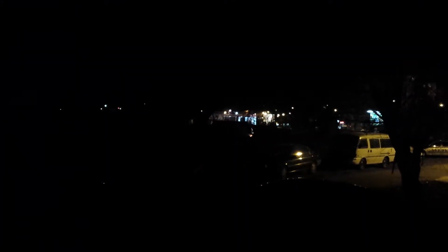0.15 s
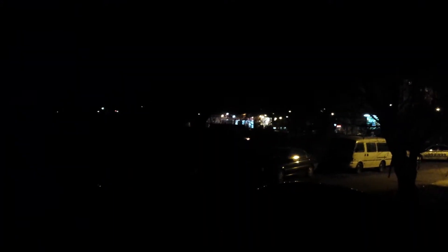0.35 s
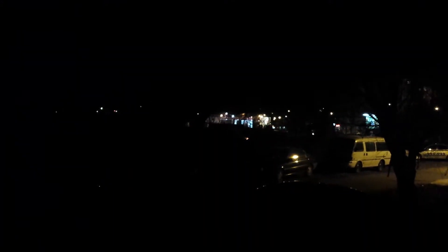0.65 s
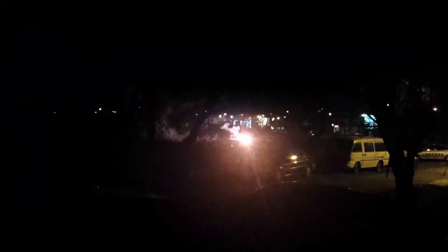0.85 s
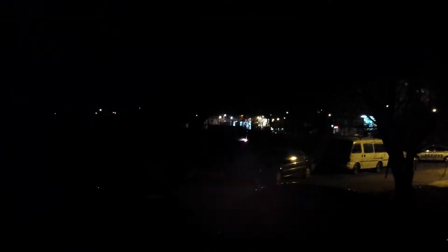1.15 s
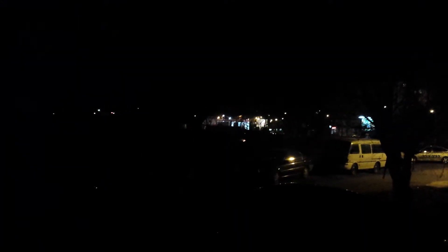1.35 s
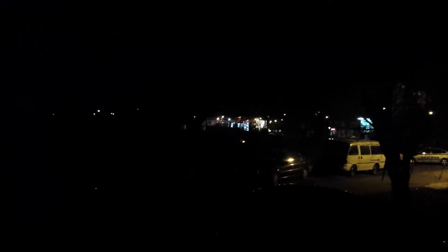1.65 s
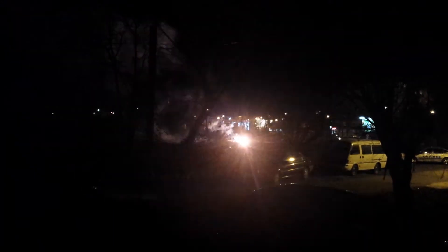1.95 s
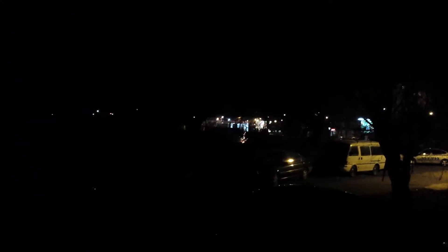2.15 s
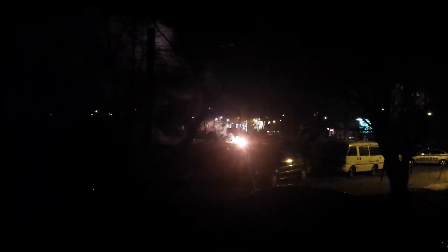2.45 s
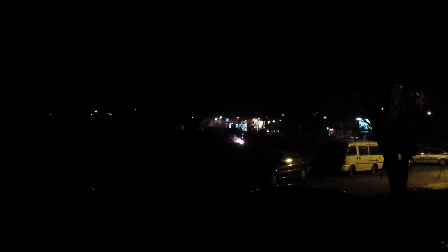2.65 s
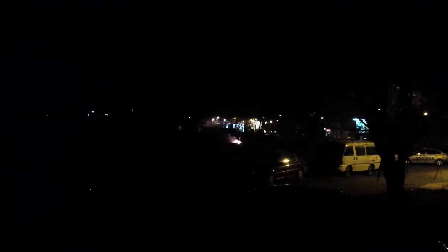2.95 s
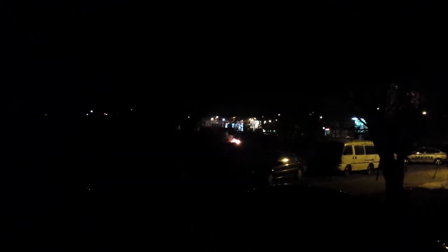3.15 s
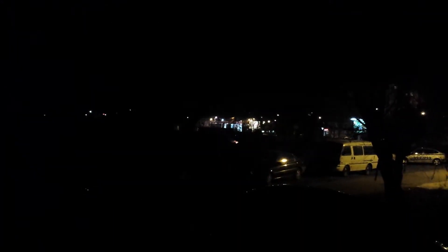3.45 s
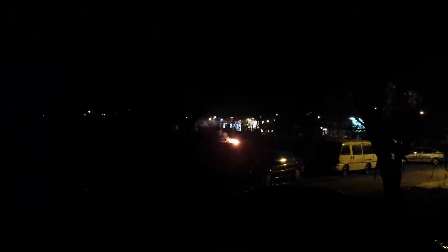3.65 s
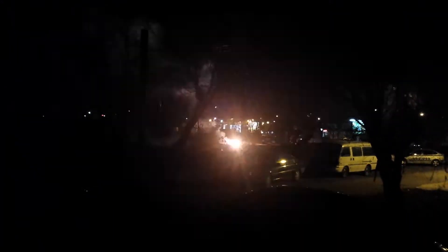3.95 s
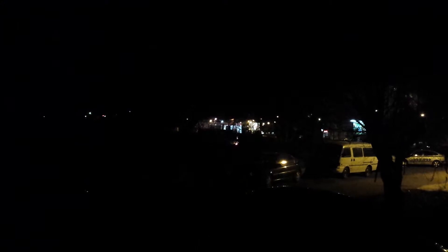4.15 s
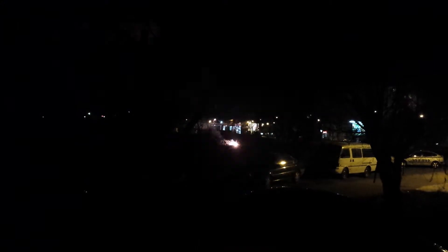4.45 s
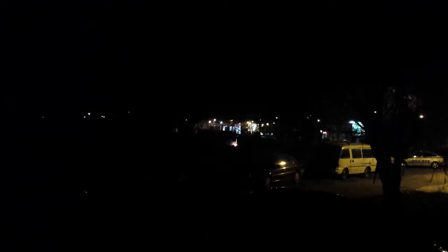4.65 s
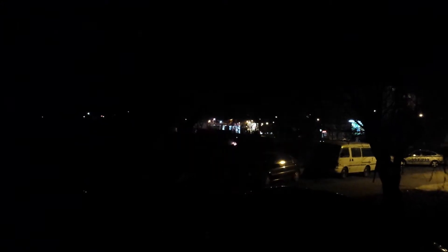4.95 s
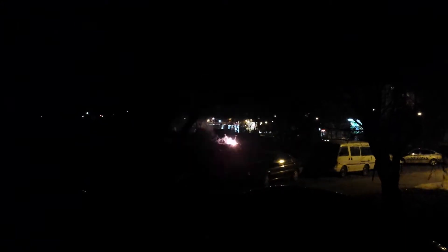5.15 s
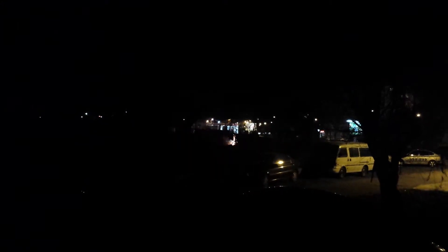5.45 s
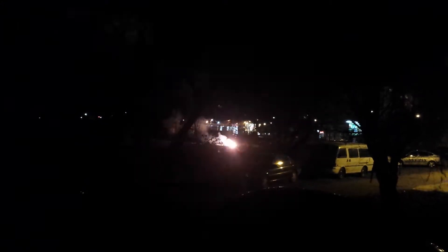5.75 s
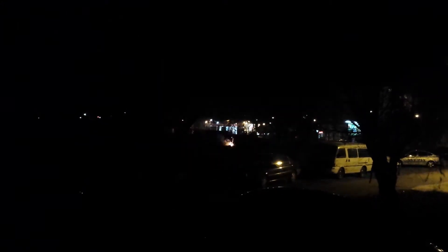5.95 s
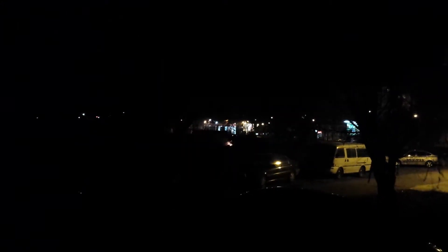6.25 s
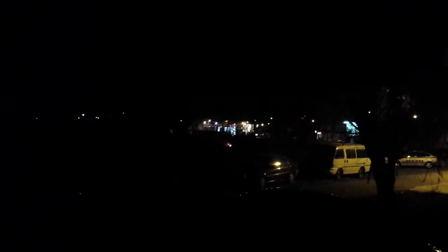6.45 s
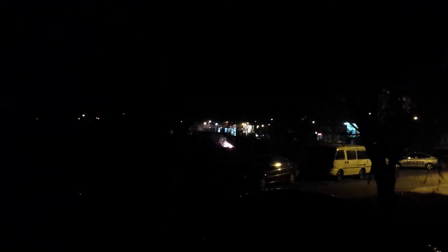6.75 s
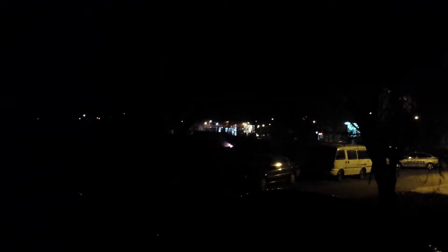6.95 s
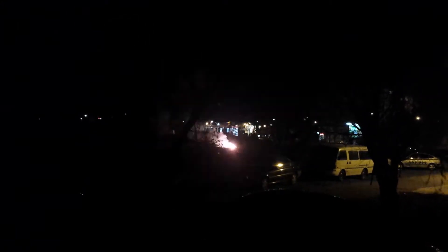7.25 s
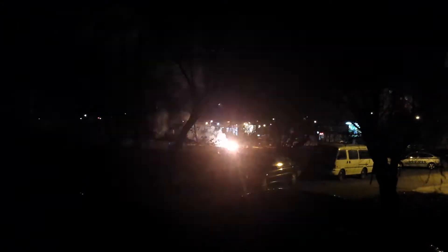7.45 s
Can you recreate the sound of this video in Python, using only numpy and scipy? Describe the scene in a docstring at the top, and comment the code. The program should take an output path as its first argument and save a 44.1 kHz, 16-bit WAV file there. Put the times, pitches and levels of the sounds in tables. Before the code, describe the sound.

A faulty power cable arcs some tens of metres away in a yard between buildings, over a faint, steady wash of far traffic. From about 0.2 to 1.5 seconds come six or so short spurts of bright, buzzing crackle, each with sharp snaps and a dull thump of hot air. After a pause, a stronger burst hits at 2.1 seconds. From 2.6 seconds the arcing is nearly continuous: an uneven stutter of high, pinging cracks, rasping buzz and sizzling metal, with a low flame roar underneath. The thumps grow heavier from about 5.3 seconds and are fiercest around 6, where a brief deep swell of air rises beneath them. The crackle stops at 6.5 seconds, then returns in a last flurry from 7 to 7.6. Each crack rings around the yard for up to a second, and a far wall softly echoes the bass.

```python
"""A yard between buildings at night, where a faulty power cable arcs some tens of metres away.
The arc restrikes on each half cycle of the mains: every strike cracks and pushes out a thump of hot air.
In the fiercer bursts molten metal sizzles and the flame roars between the strikes; one burst has a deep
swell under it. The ground reflects, the buildings reverberate, and far traffic makes a faint wash."""
import sys
import numpy as np
from scipy import signal
from scipy.fft import rfft, irfft
from scipy.io import wavfile
from scipy.ndimage import uniform_filter1d, minimum_filter1d

SR = 44100
rng = np.random.default_rng(int(sys.argv[2]) if len(sys.argv) > 2 else 0)


def unload_audio(sound):
    """Save the sound as a 16-bit wav file, at the path given as the first command line argument."""
    columns = np.transpose(np.atleast_2d(sound))
    # keep every value between -1 and 1, then stretch to whole-number steps
    steps = np.round(np.clip(columns, -1, 1) * 32767)
    wavfile.write(sys.argv[1], SR, steps.astype(np.int16))


N = 334674
HZ = np.fft.rfftfreq(N, 1 / SR)
STRIKES_PER_S, FIRST_STRIKE_S = 100, .0064  # two strikes per mains cycle
PING_HZ, PING_HZ_PER_DB = 5585, 153  # a shorter spark channel pings higher and is brighter

# Strikes that stand out, alone or where a burst ignites, flares or breaks:
# (time [s], relative crack level [dB], relative thump level [dB], ping frequency [Hz], duration [s])
SNAPS = [(0.2473, -19.5, -24.5, 4870, 0.0045), (0.258, -18, -31, 5230, 0.0052),
         (0.2927, -24, -37, 5700, 0.0026), (0.301, -20, -30, 5530, 0.0041),
         (0.5944, -24, -20.5, 5050, 0.0031), (0.6103, -19, -42, 5800, 0.0018),
         (0.8634, -16.5, -32, 8870, 0.0055), (1.168, -19, -20.5, 5530, 0.0041),
         (1.185, -19.5, -40, 6000, .0034), (1.201, -18, -32, 5740, 0.0055),
         (1.313, -18, -25.5, 3450, 0.0071), (1.3845, -21.5, -31, 5500, 0.0041),
         (1.473, -15.5, -19, 3370, 0.0083), (2.1431, -13, -27, 5617, 0.0072),
         (2.651, -26, -28.5, 6060, .0035), (2.6597, -21, -30, 5960, .0035), (2.669, -25, -32, 6100, 0.0048),
         (2.678, -20.5, -30, 5880, .004), (2.689, -20, -35, 5960, .0047), (2.699, -24, -34, 6000, 0.0057),
         (2.711, -16.5, -37, 6000, 0.0063), (2.753, -22, -24.5, 5900, 0.0059),
         (2.8265, -20, -22.5, 5310, 0.0036), (2.8665, -23.5, -24.5, 4450, 0.0026),
         (2.8853, -27.5, -31, 5830, 0.0036), (2.8945, -18.5, -23, 5760, 0.0066),
         (2.907, -21.5, -22.5, 5460, .0048), (3.0174, -23.5, -31, 5837, 0.0028),
         (3.1047, -13.5, -23, 5630, 0.0041), (3.124, -19.5, -26, 7000, 0.0057),
         (3.187, -23, -26.5, 5984, 0.004), (3.207, -23.5, -27, 5960, .003),
         (3.2375, -20, -28.5, 5400, 0.002), (3.276, -27.5, -26.5, 5900, 0.0034),
         (3.338, -21.5, -22.5, 5700, .0023), (3.3475, -21.5, -23.5, 4700, 0.0026),
         (3.3954, -20.5, -22, 5870, 0.0039), (3.4354, -21.5, -23, 5960, 0.0051),
         (3.4865, -24, -22, 5700, 0.0033), (3.687, -25.5, -24.5, 5916, 0.0029),
         (3.697, -22, -24, 5670, 0.0021), (3.718, -21, -21, 5880, 0.0019),
         (3.9554, -25.5, -18, 5902, 0.0029), (4.0063, -26, -24, 5580, 0.0023),
         (4.0705, -34, -29, 4895, 0.0043), (4.1182, -23, -40, 5756, 0.0024),
         (4.1286, -24, -33, 5710, 0.002), (4.1378, -14.5, -30, 5600, 0.0032),
         (4.147, -20.5, -28, 5690, .003), (4.1666, -16.5, -26, 5695, 0.0039),
         (4.196, -15, -25, 5900, 0.0019), (4.235, -18, -30, 5800, .0032),
         (4.2456, -13.5, -24, 6100, 0.0017), (4.265, -19.5, -26, 6200, 0.0028),
         (4.304, -22, -23.5, 6400, 0.0018), (4.568, -22, -25, 5600, 0.0032),
         (4.575, -18.5, -25.5, 5880, 0.0051), (4.585, -19, -32, 5860, 0.0031),
         (4.7273, -31, -27, 5950, .003), (4.8258, -24, -22, 5834, 0.0044),
         (4.827, -19.5, -25, 2046, 0.0069), (4.893, -21, -25, 5570, .003),
         (5.0227, -25.5, -22, 5730, 0.0054), (5.0862, -29.5, -18.5, 5900, .0071),
         (5.1058, -35, -24, 5870, .003), (5.1977, -35, -28, 5690, 0.0037),
         (5.223, -21.5, -27.5, 5900, 0.0036), (5.281, -27, -26.5, 6090, 0.002),
         (5.3183, -27, -17.5, 5480, 0.0045), (5.4084, -21, -27.5, 5580, 0.0033),
         (5.445, -21.5, -22, 5380, 0.0076), (5.467, -20, -26, 5190, 0.0045),
         (5.5566, -26.5, -24, 5350, 0.004), (5.5654, -20.5, -16.5, 5420, 0.0039),
         (5.587, -20.5, -17.5, 5900, 0.0015), (5.601, -22, -19, 5700, 0.0026),
         (5.616, -28, -17, 5404, 0.0059), (5.657, -20.5, -15, 5684, .0035),
         (5.6972, -37, -15.5, 5960, .004), (5.7019, -22.5, -21, 6033, 0.0023),
         (5.804, -23.5, -25, 4280, 0.0058), (5.843, -33, -22, 6240, 0.0032),
         (5.867, -38, -21, 5940, 0.0041), (5.886, -35, -22, 4400, 0.0043),
         (5.9255, -34.5, -20, 5944, 0.0039), (6.0117, -15, -20, 5406, .0056),
         (6.039, -21.5, -11.5, 7704, 0.0038), (6.1104, -21.5, -16, 5870, 0.0033),
         (6.1766, -24, -23, 6030, 0.0045), (6.2368, -23, -23, 5008, .006), (6.277, -24, -42, 4892, .0031),
         (6.296, -15, -35, 4384, 0.0026), (6.332, -18, -26, 4663, 0.0029),
         (6.465, -17.5, -23, 4594, 0.0058), (6.477, -22, -21, 4604, 0.0037), (6.967, -27, -24, 5980, .0018),
         (7.058, -28, -28, 5300, 0.0033), (7.075, -23, -22, 6030, 0.0039),
         (7.0986, -21.5, -21, 6170, 0.0027), (7.1173, -20.5, -29, 6700, 0.0031),
         (7.188, -28, -41, 5956, 0.0017), (7.207, -17.5, -22.5, 5030, 0.0039),
         (7.337, -17, -19, 4980, 0.0015), (7.4164, -27, -22.5, 6600, .0019),
         (7.4345, -26.5, -21, 6200, 0.0026), (7.508, -18.5, -36, 6095, 0.0033),
         (7.5164, -19, -34, 6030, 0.0044), (7.5263, -18, -31, 5415, .0035),
         (7.5854, -21.5, -33, 4920, .003)]
# Spans in which the arc burns: (start [s], end [s], relative crackle level [dB],
# relative thump level [dB], share of unbroken sizzle [0-1], brightness [dB])
BURSTS = [(.242, 0.316, -21, -22.5, 0.86, 9), (.591, 0.619, -17, -20.5, 1, -5.5),
          (.858, 0.876, -22, -25.5, 0.9, 7), (1.164, 1.211, -17.5, -22, 0.94, -1),
          (1.313, 1.327, -8, -17, 1, -14), (1.365, 1.396, -20.5, -25.5, 0.93, 4),
          (1.47, 1.488, -14, -27.5, 1, -4), (2.143, 2.238, -16, -19.5, 0.86, 2.5),
          (2.252, 2.299, -18.5, -19.5, 0.75, 3.5), (2.648, 2.719, -16.5, -22.5, 0.67, 10),
          (2.73, 2.788, -20.5, -25, 0.83, -5), (2.966, 3.007, -24, -26, 0.1, -5.5),
          (3.02, 3.057, -17.5, -29.5, 0, -4), (3.063, 3.089, -24.5, -24, .01, -5),
          (3.102, 3.139, -24, -21.5, 0.24, 11.5), (3.21, 3.24, -23, -26.5, 0, -2.5),
          (3.262, 3.272, -28, -23, 0.04, -2), (3.313, 3.324, -25, -25, .05, -5),
          (3.384, 3.458, -25.5, -26, 0, -3), (3.485, 3.552, -21.5, -25, 0.1, -2),
          (3.555, 3.598, -28.5, -23, 0, -5.5), (3.815, 3.85, -14.5, -22, .25, -4.5),
          (3.916, 4.036, -33, -23, 0.1, 3.5), (4.172, 4.192, -27, -28, 0, -6),
          (4.234, 4.261, -25, -25, 0.75, -1), (4.261, 4.304, -26, -23, 0.79, 19),
          (4.575, 4.687, -27.5, -26, 0.2, 2.5), (4.73, 4.75, -30, -25, 0.05, 3),
          (4.867, 4.909, -17.5, -21, 0.75, -5), (5.011, 5.024, -23.5, -20.5, 0.98, -1),
          (5.206, 5.23, -20.5, -19.5, 0.85, 4), (5.28, 5.334, -20.5, -17, 0.92, 3),
          (5.58, 5.706, -17.5, -17.5, 0.81, 0.5), (6.01, 6.088, -21.5, -15.5, .65, 4),
          (6.105, 6.219, -25.5, -20, 0.43, 2), (6.318, 6.368, -17, -23.5, 0.73, -1),
          (6.374, 6.436, -28.5, -24, 0.21, -6), (7.082, 7.131, -23, -28, 0.35, 5),
          (7.163, 7.226, -31.5, -30, 0.1, 9), (7.53, 7.554, -15, -25, 0.31, 4),
          (7.552, 7.583, -24.5, -25.5, 0.35, 0)]
# Reverberation of the yard: (frequency [Hz], reverberation time [s])
YARD_T60 = [(60, 0.28), (250, 1), (1000, 1), (3000, 1.0), (4200, 0.84), (4750, 0.73), (5250, 0.84),
            (6000, 0.76), (6500, 0.73), (7200, 0.6), (8300, 0.46), (9700, 0.61), (12000, 0.23)]


def strike(crack_db, thump_db, bright_db, ping_hz, ping_db, spark_s, puff_s=.0047, flutter=.68):
    """One ignition: discharges excite the channel's resonances, and thermal expansion pushes the air."""
    t = np.arange(SR // STRIKES_PER_S) / SR
    progress = np.minimum(t / np.clip(spark_s, .0005, t[-1]), 1)
    swell = np.sin(np.pi * progress ** .7)
    spectrum = rfft(rng.standard_normal(len(t)) * swell)
    cluster = irfft(spectrum / np.sqrt(abs(spectrum) + 1e-9), len(t)) * swell  # flatter spectrum
    pitch, strength = rng.standard_normal(2)
    hollow = resonate(cluster, hz=2220 + 200 * pitch, db=1 + 5 * strength, width_hz=220)
    crack = ground_bounce(resonate(hollow, ping_hz, ping_db, width_hz=380))
    push = flutter * unit(np.exp(-t / puff_s) * rng.standard_normal(len(t)))
    push[rng.integers(0, len(t) // 6)] += 1
    scale = np.sqrt(len(t))
    return scale * amp(crack_db) * brighten(crack, bright_db), scale * amp(thump_db) * unit(push)


def snaps():
    """Channel length links pitch to brightness. Yields each snap's time and strike settings."""
    for s, crack_db, thump_db, ping_hz, spark_s in SNAPS:
        bright_db = np.clip((ping_hz - PING_HZ) / PING_HZ_PER_DB, -.5, 12.5)
        ping_db = 5
        yield s, crack_db - 1, thump_db - 2, bright_db, ping_hz, ping_db, spark_s


def buzz(misfire_share=.089, misfire_db=-27, long_share=.12, long_hz=1900, ping_db=1.5, jitter_s=.0004):
    """Periodic reignition: yields time and strike settings for a burst's half cycles without a snap."""
    half_cycles = np.arange(FIRST_STRIKE_S, N / SR, 1 / STRIKES_PER_S)
    chance = rng.standard_normal((len(half_cycles), 7))
    # now and then a half cycle barely ignites, or a long channel gives a low knock
    misfire, long_channel = (rng.random((len(half_cycles), 2)) < [misfire_share, long_share]).T
    free = abs(half_cycles[:, None] - np.array(SNAPS)[:, 0]).min(1) > .5 / STRIKES_PER_S
    for start, end, crackle_db, thump_db, share, burst_bright_db in BURSTS:
        struck_db = 10 * np.log10(1 - np.clip(share, .02, .95))  # energy not spent on sizzle
        for k in np.flatnonzero(free & (half_cycles > start) & (half_cycles < end)):
            s = half_cycles[k]
            force, weight, late, shine, pitch, _, linger = chance[k]
            first = s - start < 1 / STRIKES_PER_S
            force_db = -3 if first else 2.5 * force + misfire_db * misfire[k]
            crack_db = crackle_db + struck_db + heating_db(s, start, end) + force_db
            push_db = thump_db - 2 + struck_db + 3 * weight
            bright_db = burst_bright_db + 4 * shine
            ping_hz = (long_hz if long_channel[k] else PING_HZ + PING_HZ_PER_DB * bright_db) + 280 * pitch
            spark_s = .0035 * (1 + 1.17 * share) * np.exp(.3 * linger)  # longer in a sizzling burst
            yield s + jitter_s * late, crack_db, push_db, bright_db, ping_hz, ping_db, spark_s


def arc():
    """Superposition of all ignitions, as one track of cracks and one of air pushes."""
    cracks, pushes = np.zeros((2, N))
    for s, *settings in [*snaps(), *buzz()]:
        crack, push = strike(*settings)
        add(cracks, s, crack)
        add(pushes, s, push)
    return cracks, pushes


def resonate(x, hz, db, width_hz):
    """Resonance: a spark channel favours a pitch set by its length."""
    f = np.fft.rfftfreq(len(x), 1 / SR)
    return irfft(rfft(x) * (1 + amp(db) / (1 + 2j * (f - hz) / width_hz)), len(x))


def brighten(x, db, corner_hz=7200):
    """A shelving filter lifts or lowers the top octave: thinner sparks are brighter."""
    hz = np.fft.rfftfreq(len(x), 1 / SR)
    shelf = 1 - 1 / (1 + (hz / corner_hz) ** 12)
    return irfft(rfft(x) * amp(db * shelf), len(x))


def heating_db(s, start, end, fade_db=3.5):
    """Heating of the gap: the crackle level falls linearly over a burst."""
    progress = (s - start) / max(end - start, .005)
    return -fade_db * (progress - .5)


def burn(sizzle_db=-5.5, roar_db=-2, throb=.35, hum=.019, peak_s=.00084, flare_db=5.5, flares_per_s=54):
    """Amplitude modulation: molten metal spits and the flame roars in step with the current."""
    sizzle, roar = np.zeros((2, N))
    flares = rng.standard_normal(N)
    for start, end, crackle_db, thump_db, share, bright_db in BURSTS:
        share = np.clip(share, .02, .95)
        t = np.arange(start, max(end, start + .005), 1 / SR)
        cycle = np.cos(2 * np.pi * STRIKES_PER_S * (t - FIRST_STRIKE_S - peak_s))
        current = 1 + throb * cycle
        flare = amp(flare_db * np.interp(t * flares_per_s, np.arange(N), flares))
        spit = unit(sparks(len(t)) * current * flare) * np.sqrt(share * len(t))
        spit_db = crackle_db + sizzle_db + heating_db(t, start, end)
        add(sizzle, start, amp(spit_db) * brighten(spit, bright_db))
        # the flame hums as it swells and shrinks
        flame = np.sqrt(share) * current * rng.standard_normal(len(t)) + hum * cycle
        add(roar, start, amp(thump_db + roar_db) * flame)
    return sizzle, roar


def sparks(samples, per_s=5000, spread_db=2.5):
    """Shot noise: tiny discharges at random moments, a few much larger than the rest."""
    size = amp(spread_db * np.minimum(rng.exponential(1, samples), 4))
    return size * rng.standard_normal(samples) * (rng.random(samples) < per_s / SR)


def crackle(cracks, sizzle, near_db=-8.5, crack_yard_db=-10, sizzle_yard_db=-4, right_yard_db=2):
    """Multipath propagation of the sharp sounds: direct path, early reflections and reverberation."""
    # Spectra of the near sound and of the yard's diffuse field:
    # (frequency [Hz], left level [dB], right level [dB])
    crack_spectrum = [(750, -38, -17.5), (1560, -21.5, -17.5), (1730, -10.5, -14.5), (2250, -12, -18.5),
                      (2900, -13, -24), (3370, -7.5, -9.5), (4280, 4.5, -9.5), (5440, 4.5, -16),
                      (5936, 8.5, -8.5), (6830, -4, -14.5), (8370, -14.5, -11.5), (10740, -36.5, -24),
                      (12100, -57, -30), (13540, -79, -57)]
    yard_spectrum = [(716, -26.5, -5), (1520, -15, -35), (1980, -9, -21), (2840, -7, -16),
                     (3220, -6.5, -14.5), (4310, 2, -15), (4870, 3, -11.5), (5200, 1.5, -10),
                     (5770, 1, -16), (6730, -3, -10), (8000, -10.5, -9.5), (8560, -10, -15),
                     (10970, -54, -21.5), (13500, -61, -45)]
    # Quick reflections from ground and trees: (frequency [Hz], reverberation time [s])
    ground_t60 = [(1200, 0.032), (2500, 0.15), (4500, 0.027), (9000, 0.03)]
    # The wandering arc throws more or less crackle into the yard: (time [s], level [dB])
    throw = [(.25, 1), (.6, 3), (.87, 5.5), (1.2, 0.5), (1.48, 0.5), (2.2, -2), (2.7, 0.5), (3.0, 1),
             (3.7, 0), (4.2, 1), (4.8, 0), (5.3, 3.5), (5.7, 3), (6.4, 0), (6.47, 1), (7.2, 3.5),
             (7.59, -1.5)]
    sizzle = butterworth(sizzle, "high", hz=2200, order=1)  # fine spits lack body
    direct = cracks + sizzle
    near = reflect(direct, ground_t60, likeness=.08, onset_s=.0029)
    throw_gain = amp(np.interp(np.arange(N) / SR, *np.transpose(throw)))
    thrown = (amp(crack_yard_db) * cracks + amp(sizzle_yard_db) * sizzle) * throw_gain
    far = reflect(thrown, YARD_T60, likeness=.04, onset_s=.0014) + convolve(thrown, yard_modes())
    front, around = stereo_response(crack_spectrum), stereo_response(yard_spectrum)
    early = convolve(direct + amp(near_db) * near, front)
    late = convolve(far * amp([[0], [right_yard_db]]), around)
    return (early + late) / np.linalg.norm(front[0])


def thumps(pushes, roar, near_db=-5, yard_db=-7, echo_s=.36, echo_db=-14, left_db=-3, right_db=-6):
    """Reverberation and echo: the dull sounds boom between buildings, and a far wall returns the bass."""
    # Spectra of one push of air and of the lasting flame: (frequency [Hz], spectral level [dB])
    push_spectrum = [(25, -46), (60, -9), (98, -2), (145, 0), (205, 2.5), (245, -6.5), (280, .5), (340, -4),
                     (410, -4.5), (470, -16.5), (525, -11), (605, -19), (810, -15), (1000, -23),
                     (1230, -20.5), (1700, -25.5), (3000, -27.5), (8000, -101)]
    roar_spectrum = [(25, -47), (48, -8), (68, 3.5), (100, 7), (135, -0.5), (185, 4), (245, -5),
                     (285, -0.5), (400, -11.5), (520, -13), (1200, -54), (3000, -60), (8000, -106)]
    direct = convolve(pushes, unit(causal(push_spectrum))) + convolve(roar, unit(causal(roar_spectrum)))
    direct = butterworth(direct, "high", hz=44, order=2)  # the thumps carry no rumble below about 44 Hz
    near = reflect(direct, t60=[(200, .27)], likeness=.87, onset_s=.0033)
    far = reflect(direct, YARD_T60, likeness=.92, onset_s=.015)
    air = direct + amp(near_db) * near + amp(yard_db) * far
    bass = butterworth(air, "low", hz=160, order=2)
    echo = np.pad(bass, ((0, 0), (round(echo_s * SR), 0)))[:, :N]
    return (air + amp(echo_db) * echo) * amp([[left_db], [right_db]])


def whoomp(start_s=5.98, length_s=.29, db=-36):
    """A deep swell of air under the fiercest burst: low-band noise in a half-sine envelope."""
    # Spectrum of the swell: (frequency [Hz], spectral level [dB])
    spectrum = [(20, -20), (40, -9), (56, 5), (80, -8), (140, -35), (400, -80)]
    rumble = irfft(rfft(rng.standard_normal(N)) * amp(read(spectrum, HZ)), N)
    progress = np.clip((np.arange(N) / SR - start_s) / length_s, 0, 1)
    return amp(db) * unit(rumble) * np.sqrt(N) * np.sin(np.pi * progress)


def ground_bounce(crack, db=-7.5, soonest_s=.001, latest_s=.0035):
    """Comb filtering by the ground reflection; the arc jumps about, so the delay varies."""
    delay = round(rng.uniform(soonest_s, latest_s) * SR)
    return unit(np.pad(crack, (0, delay)) + amp(db) * np.pad(crack, (delay, 0)))


def reflect(x, t60, likeness, onset_s, count=3, crossfade_hz=.95):
    """Three reverberation tails slowly crossfade, so the echo stays smooth and no pitch keeps ringing."""
    phase = 2 * np.pi * crossfade_hz * np.arange(N) / SR
    weights = [np.cos(phase + np.pi * k / count) * np.sqrt(2 / count) for k in range(count)]
    return sum(convolve(x * weight, diffuse_tail(t60, likeness, onset_s)) for weight in weights)


def diffuse_tail(t60, likeness, onset_s, reflections_per_s=4000):
    """Stereo response of many reflections, each band decaying exponentially at its own rate."""
    t = np.arange(SR) / SR
    left, other = rng.standard_normal((2, SR)) * (rng.random((2, SR)) < reflections_per_s / SR)
    hz, frame_s, bands = signal.stft(stereo_pair(left, other, likeness), SR, nperseg=256)
    decay = amp(-60 * frame_s / read(t60, hz)[:, None])
    tail = signal.istft(bands * decay, SR, nperseg=256)[1][:, :SR]
    return np.sqrt(2) * unit(tail * (1 - np.exp(-t / onset_s)))


def yard_modes():
    """Narrow-band decay: stereo response of the few high pitches that linger after a crack."""
    # Ringing of the yard: (frequency [Hz], level [dB], reverberation time [s], spectral blur [Hz])
    modes = [(4610, -23.5, 1, 45), (4850, -22.5, .8, 81), (6400, -29, .7, 100), (8850, -18.5, .55, 260)]
    t = np.arange(SR) / SR
    response = np.zeros((2, SR))
    for hz, db, t60, blur_hz in modes:
        blur = np.exp(-(np.fft.fftfreq(SR, 1 / SR) / blur_hz) ** 2)
        waver = np.fft.ifft(blur * np.exp(2j * np.pi * rng.random((2, SR))))
        tone = (waver * np.exp(2j * np.pi * hz * t)).real
        response += np.sqrt(2) * amp(db) * unit(tone * amp(-60 * t / t60))
    return response


def town(left_db=-43, right_db=-46.5):
    """Far traffic as a diffuse field: steady noise, coherent between left and right only in the bass."""
    # Spectrum of the traffic: (frequency [Hz], spectral level [dB])
    spectrum = [(20, -32), (40, -10), (62, 0.5), (85, -7), (125, -5), (200, -16), (700, -17), (1300, -18),
                (1850, -14), (2500, -24), (5000, -31), (8000, -43), (14000, -52)]
    # Likeness of left and right: (frequency [Hz], correlation [0-1])
    likeness = [(100, 1), (300, 0.96), (700, 0.69), (1500, 0.008), (8000, 0.01635)]
    left, other = rfft(rng.standard_normal((2, N))) * amp(read(spectrum, HZ))
    wash = irfft(stereo_pair(left, other, read(likeness, HZ)), N)
    return amp([[left_db], [right_db]]) * unit(wash) * np.sqrt(2 * N)


def stereo_pair(left, other, likeness):
    """Partial coherence: mixes two independent noises into channels of the given correlation."""
    return np.array([left, likeness * left + np.sqrt(1 - likeness ** 2) * other])


def stereo_response(table):
    """Left and right impulse responses of a two-channel spectrum, with the bass cut."""
    hz, left_db, right_db = np.transpose(table)
    return np.array([causal([(100, -37.5), *zip(hz, db)]) for db in (left_db, right_db)])


def causal(points, size=4096):
    """Minimum-phase impulse response of the given spectrum."""
    log_gain = np.log(amp(read(points, abs(np.fft.fftfreq(size, 1 / SR)))))
    return np.fft.ifft(np.exp(np.conj(signal.hilbert(log_gain)))).real[:size // 2]


def butterworth(x, kind, hz, order):
    """Maximally flat high-pass or low-pass filter."""
    return signal.sosfilt(signal.butter(order, hz, kind, fs=SR, output="sos"), x)


def convolve(x, response):
    """Convolution of one or two channels with one or two impulse responses."""
    return signal.fftconvolve(np.atleast_2d(x), np.atleast_2d(response), axes=1)[:, :N]


def read(points, hz):
    """Interpolates (frequency [Hz], value) points on a logarithmic frequency axis."""
    f, value = np.transpose(points)
    return np.interp(np.log(hz + 1), np.log(f + 1), value)


def add(mix, s, sound):
    """Superposes a sound on the mix at time s."""
    part = mix[max(round(s * SR), 0):][:len(sound)]
    part += sound[:len(part)]


def amp(db):
    """Decibels to amplitude ratio."""
    return 10 ** (np.asarray(db) / 20)


def unit(x):
    """Normalises to unit energy."""
    return x / np.sqrt(np.sum(x ** 2) + 1e-20)


def scene():
    """The arc over the town's wash; by path difference it arrives one sample sooner on the left."""
    cracks, pushes = arc()
    sizzle, roar = burn()
    left, right = crackle(cracks, sizzle) + thumps(pushes, roar) + whoomp()
    return np.array([left, np.pad(right, (1, 0))[:N]]) + town()


def record(dry, ceiling=.93, cutoff_hz=14400):
    """Peak limiting holds the loudest cracks under full scale; a low-pass filter limits the band."""
    allowed = np.minimum(1, ceiling / (abs(dry).max(0) + 1e-9))
    gain = uniform_filter1d(minimum_filter1d(allowed, size=80), size=70)
    lowpass = signal.firwin(255, cutoff_hz, window=("kaiser", 8), fs=SR)
    return signal.oaconvolve(dry * gain, lowpass[None], "same")


dry = scene()
out = record(dry)
unload_audio(out)
```